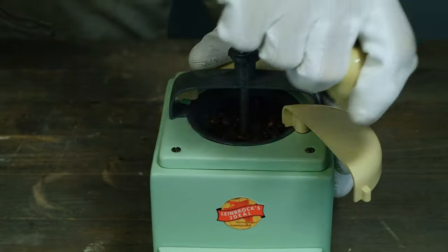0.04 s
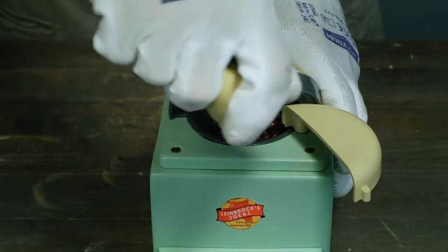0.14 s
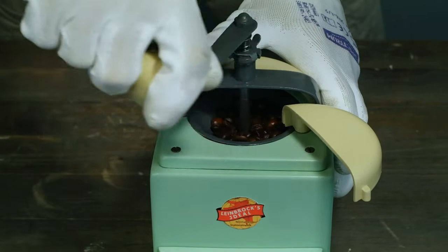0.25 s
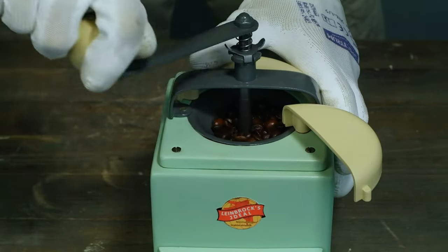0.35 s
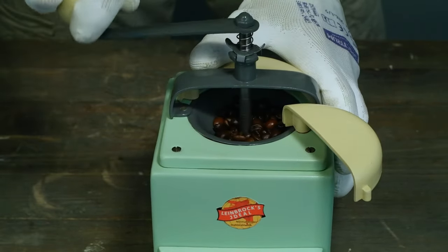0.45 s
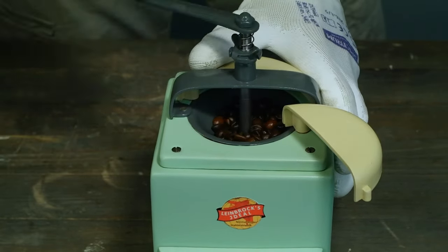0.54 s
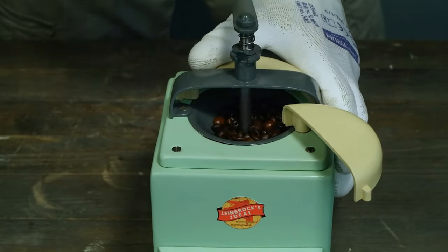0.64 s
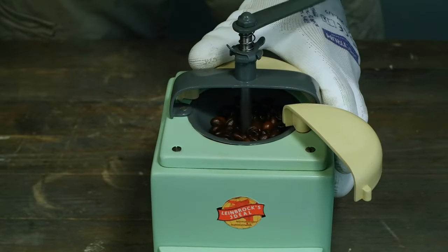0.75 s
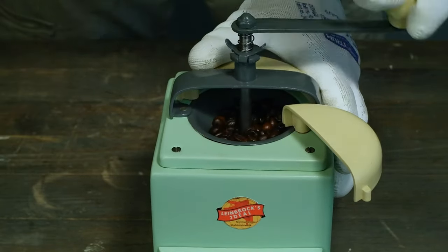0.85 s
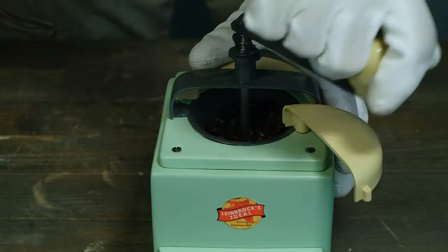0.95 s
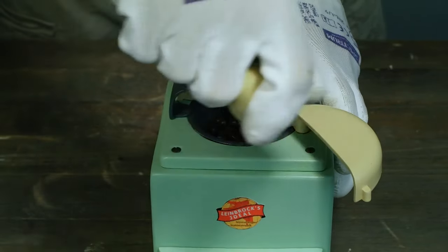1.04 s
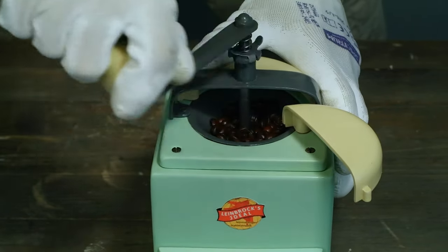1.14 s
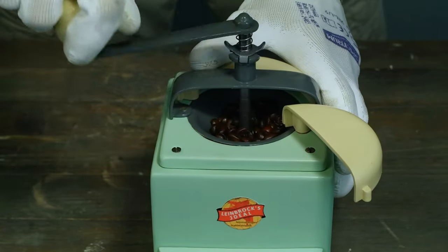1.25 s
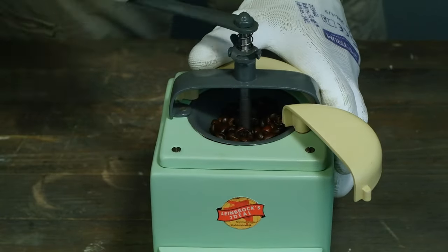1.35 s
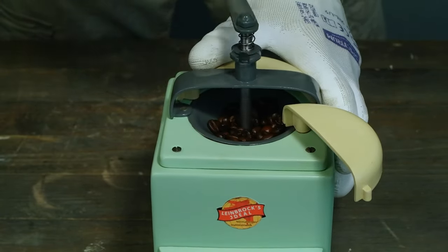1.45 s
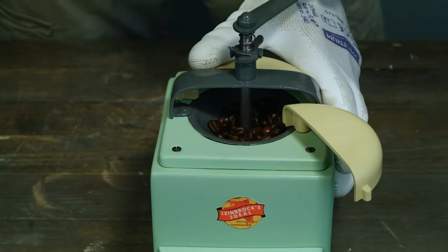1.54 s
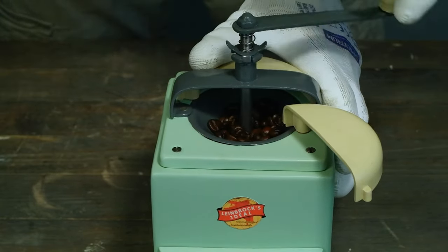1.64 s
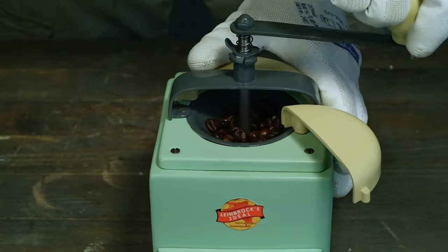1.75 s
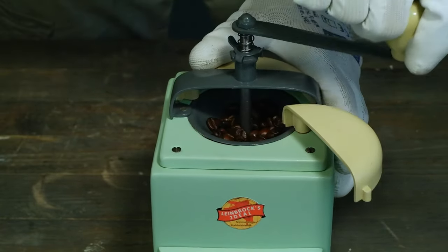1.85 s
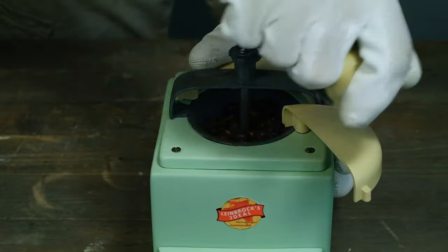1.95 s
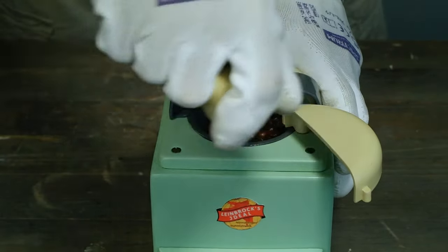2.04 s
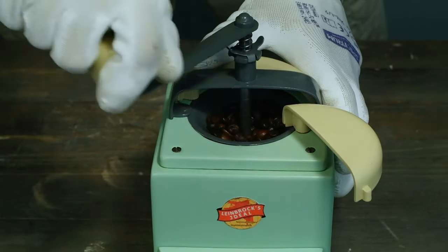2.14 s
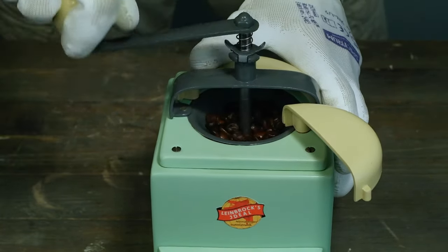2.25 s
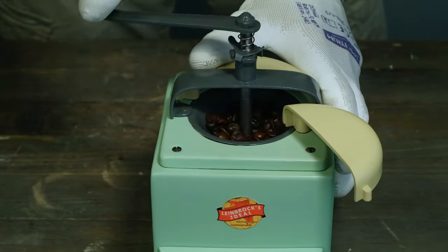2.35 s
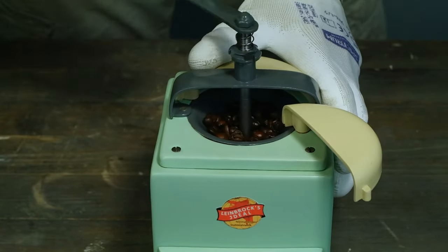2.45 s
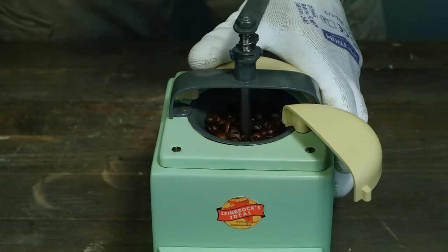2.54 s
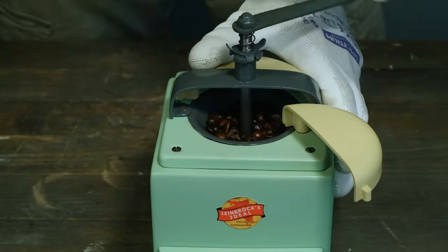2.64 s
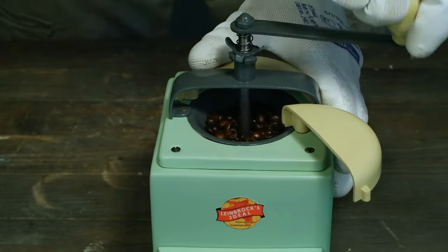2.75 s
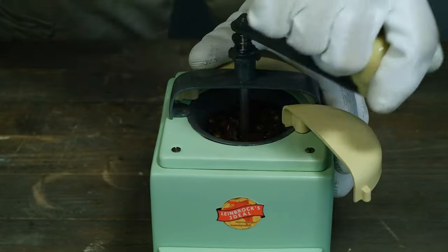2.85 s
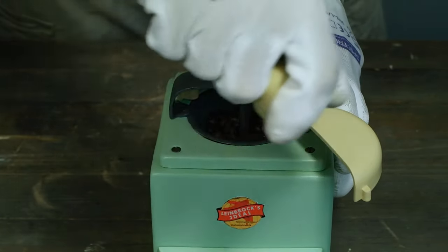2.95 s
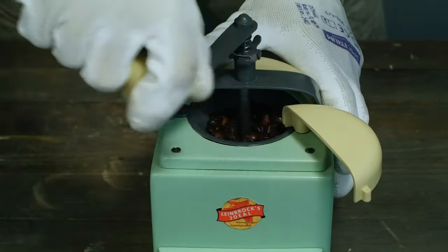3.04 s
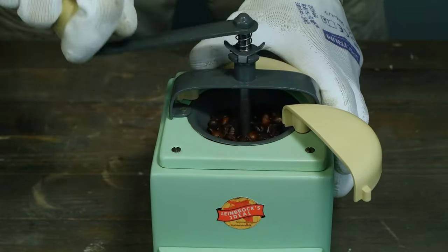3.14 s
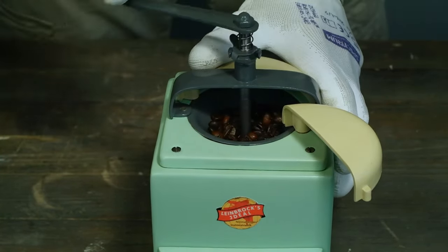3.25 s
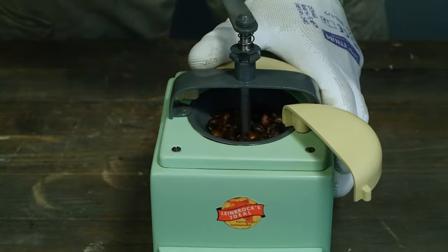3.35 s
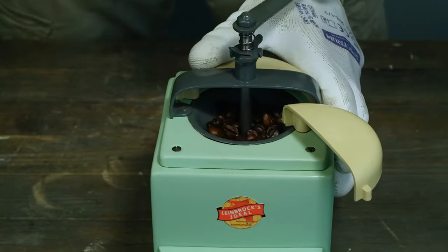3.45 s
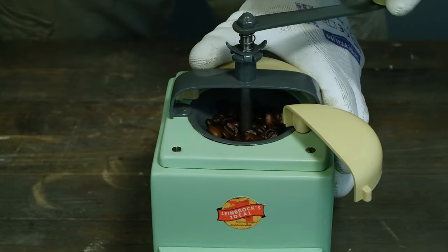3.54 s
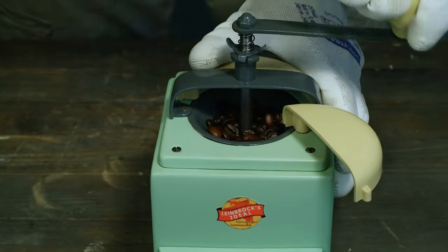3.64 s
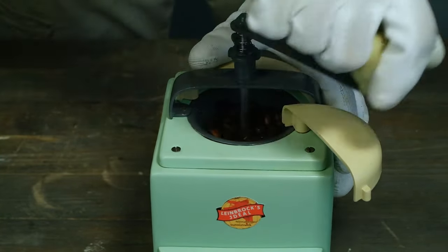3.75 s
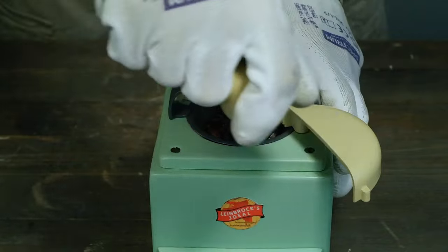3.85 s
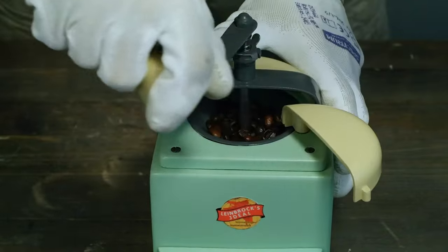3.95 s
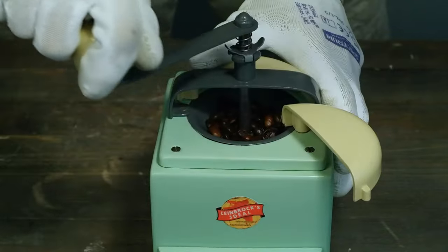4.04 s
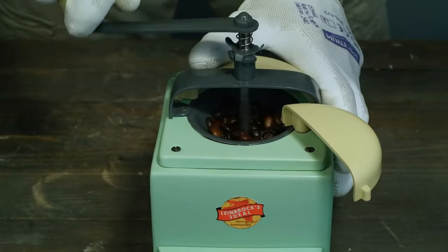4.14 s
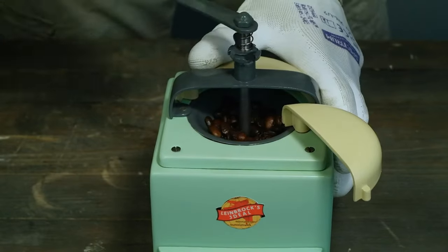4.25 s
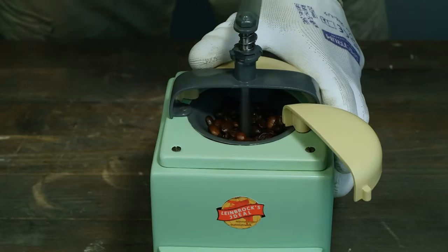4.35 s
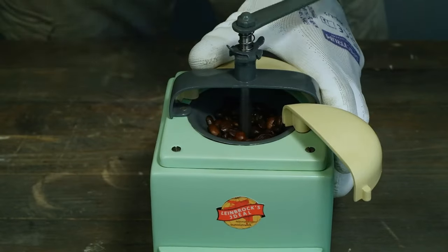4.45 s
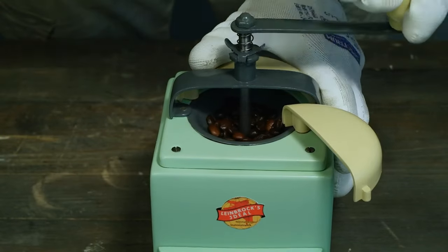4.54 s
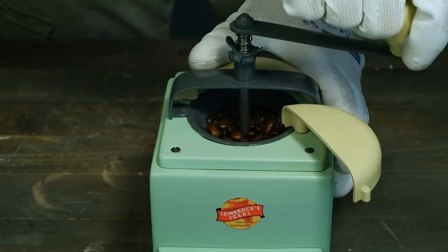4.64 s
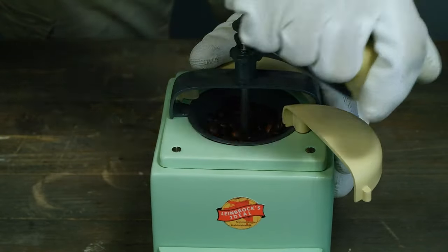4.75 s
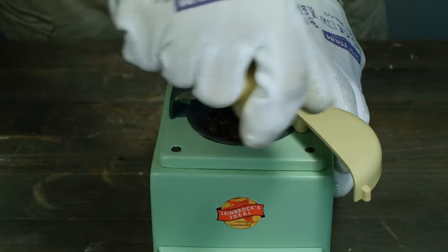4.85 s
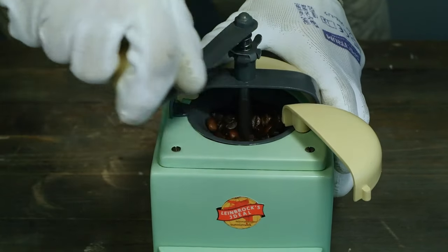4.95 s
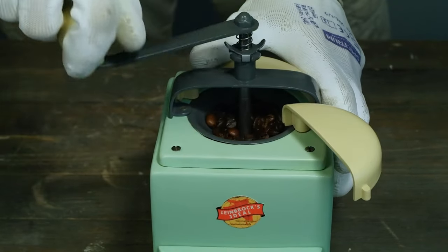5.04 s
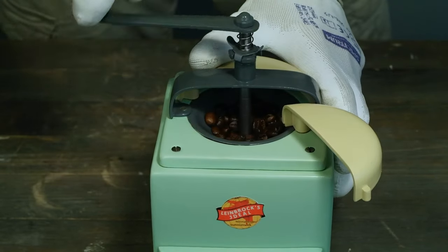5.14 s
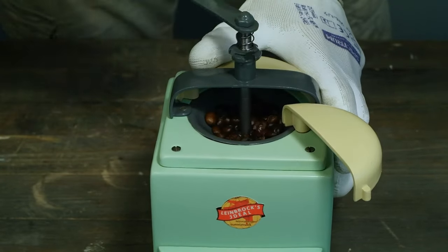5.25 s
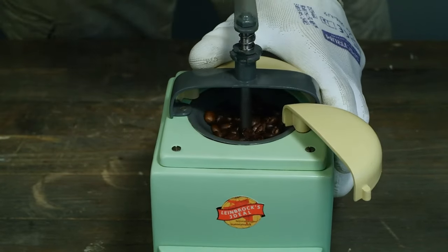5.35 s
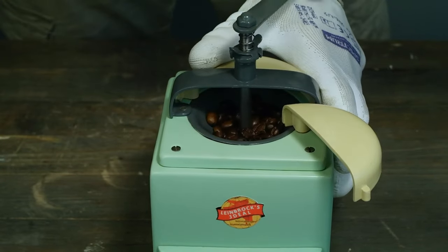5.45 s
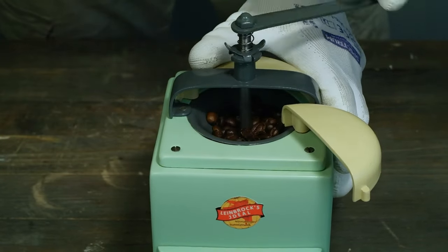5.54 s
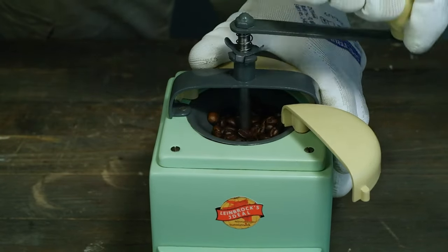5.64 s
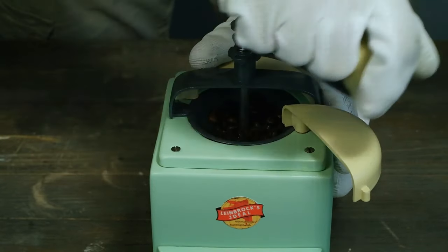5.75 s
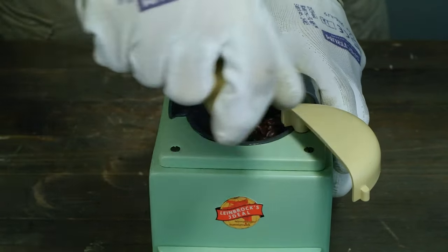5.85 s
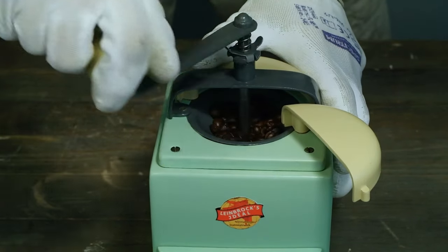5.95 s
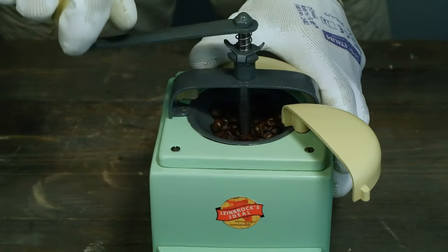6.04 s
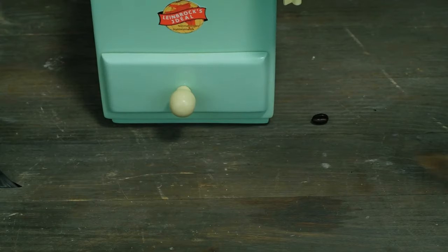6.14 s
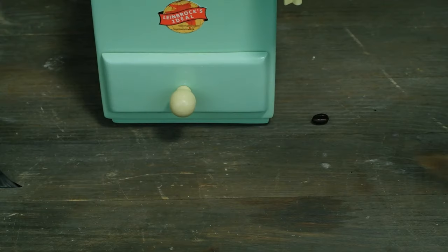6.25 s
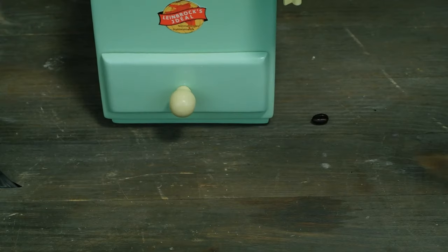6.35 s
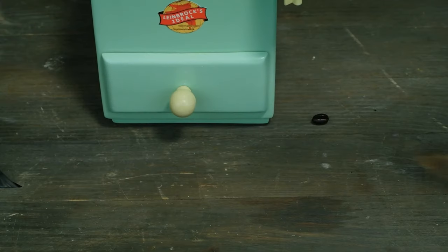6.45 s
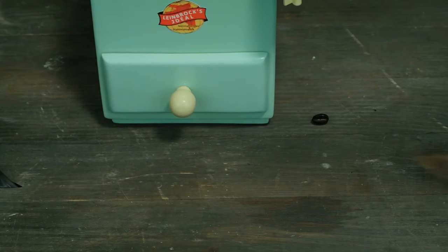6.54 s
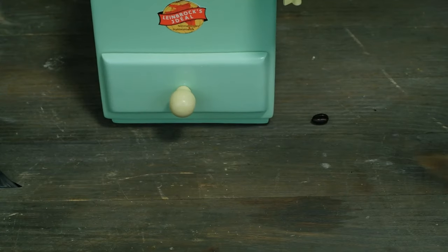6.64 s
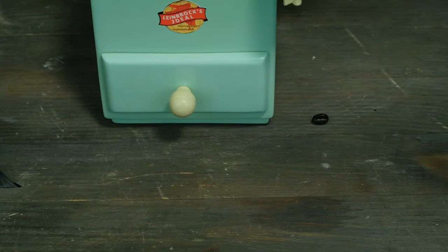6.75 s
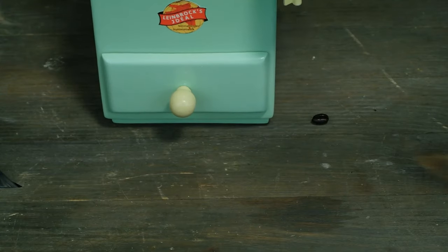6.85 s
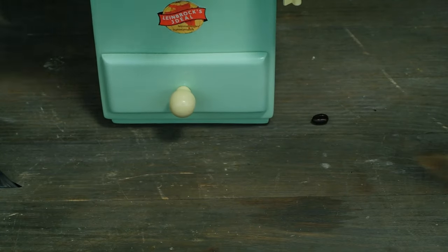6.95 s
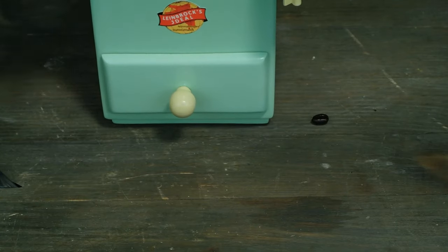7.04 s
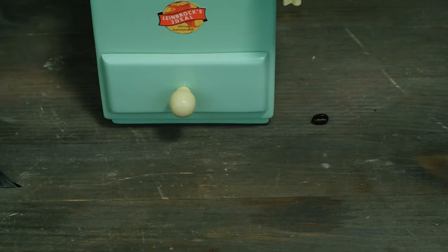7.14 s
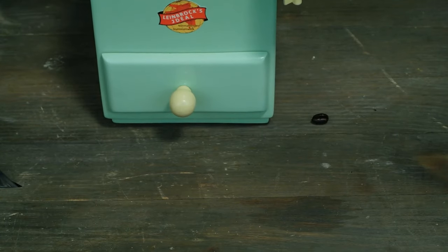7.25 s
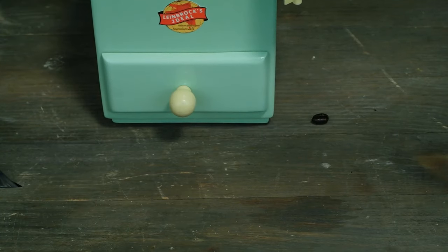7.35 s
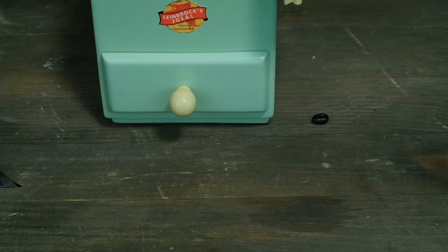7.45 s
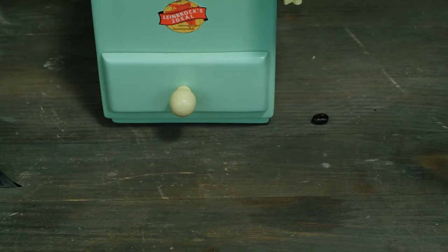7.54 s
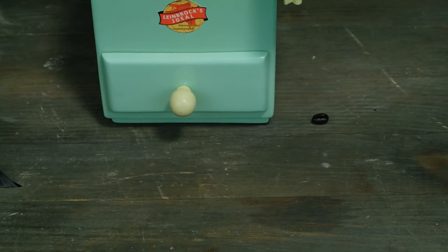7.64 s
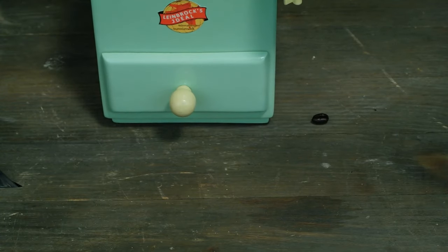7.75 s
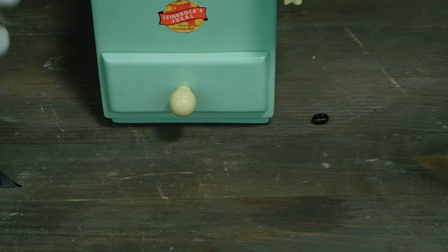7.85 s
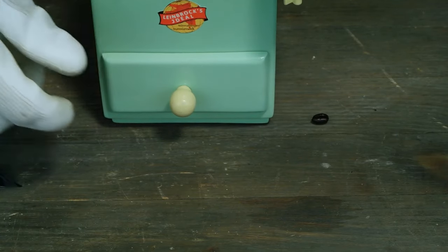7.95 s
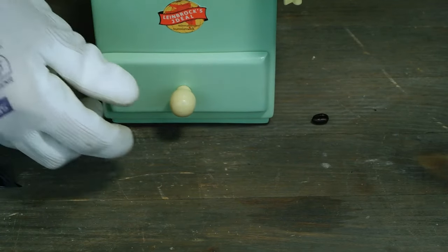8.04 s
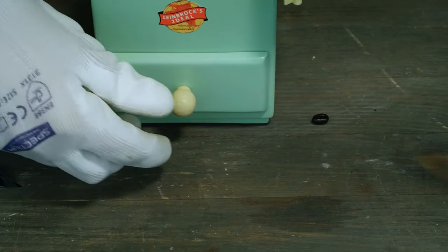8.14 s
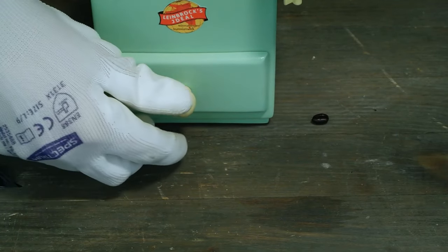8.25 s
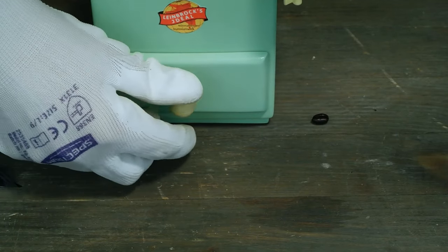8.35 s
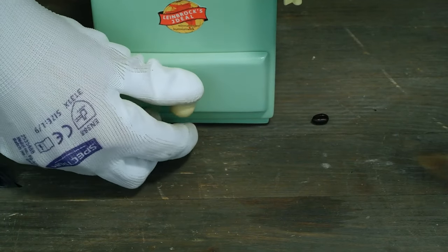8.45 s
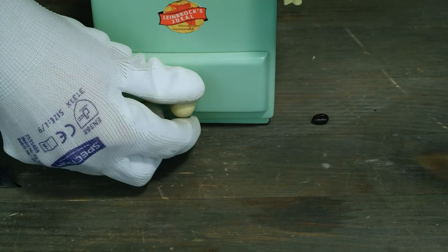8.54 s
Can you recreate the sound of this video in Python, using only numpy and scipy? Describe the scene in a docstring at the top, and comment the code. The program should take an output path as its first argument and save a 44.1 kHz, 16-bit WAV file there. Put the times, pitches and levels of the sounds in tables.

```python
"""A hand-cranked coffee mill on a wooden table, heard close and somewhat to the right.
Beans crack between the burrs: random clicks and single snaps ring through the wooden box and the open hopper.
Each turn swells hollow and its level changes where the hand changes over; later the tone brightens and thins.
At the end the grinding falls in level and stops while a smooth filtered-noise hiss has set in.
A double click follows, and the hiss dies away."""
import sys
import numpy as np
from scipy import signal
from scipy.fft import rfft, irfft, next_fast_len
from scipy.io import wavfile
from scipy.ndimage import uniform_filter1d

SR = 44100
rng = np.random.default_rng(int(sys.argv[2]) if len(sys.argv) > 2 else 0)


def persist_wave(psi):
    """Save psi, clipped to +-1, as 16-bit WAV."""
    counts = np.round(np.clip(psi, -1, 1) * 32767).astype(np.int16)
    wavfile.write(sys.argv[1], SR, np.atleast_2d(counts).T)


N = 378818

# Resonances and dips of box, hopper and crank.
# Each row: centre in Hz, width in Hz, peak gain in dB.
BOX_MODES = [(166, 16, 8), (250, 40, 6), (306, 22, 7), (330, 30, -7), (362, 15, 5), (388, 25, -4),
             (463, 18, -6), (528, 20, -6), (488, 10, 11), (582, 10, -4), (637, 20, -5), (599, 14, 6.5),
             (682, 14, 5.5), (799, 18, 5), (864, 20, 6), (920, 40, 5), (1005, 10, -4), (1019, 16, 4),
             (1070, 45, 3), (1133, 30, 6), (1309, 25, 5), (1371, 16, 6), (1467, 25, 6.5), (1525, 20, 5),
             (1700, 60, 4), (1820, 35, 6), (1946, 40, 7), (2170, 50, 4), (2258, 50, 5), (4231, 20, 4),
             (2430, 150, -3), (3450, 100, 3), (6850, 330, 3), (9250, 370, 4), (10800, 150, 2),
             (13900, 600, 3), (15000, 900, 5)]
# Dips in the treble at near multiples of 1.6 kHz. Each row: centre in Hz, width in Hz, gain in dB.
TREBLE_DIPS = [(4820, 220, -12), (7950, 150, -4), (9600, 200, -11), (12600, 1400, -2.5), (14390, 300, -10)]
SLOWS_S, RESTS_S = 7.224, 7.56   # the level starts to run down; the grinding stops


def mill(count=5):
    """Source and filter: grit, chips and snaps excite the box (below 3 kHz) and the hopper (above)."""
    # Beans that snap. Each row: time in seconds, level in dB of the crack in four bands
    # from dull to bright, level of the table-top jolt in dB.
    snap_rows = [(0.0676, -30, -32, -35, -27, -77), (0.2907, -37, -53, -43, -34, -79),
                 (0.4323, -31, -36, -34, -32, -80), (0.4458, -44, -36, -38, -32, -80),
                 (0.4654, -35, -36, -37, -28, -73), (0.4708, -40, -32, -39, -32, -77),
                 (0.4805, -36, -45, -47, -35, -78), (0.4935, -38, -40, -38, -30, -78),
                 (0.4968, -32, -46, -40, -33, -79), (0.7445, -47, -40, -39, -35, -82),
                 (0.7898, -30, -40, -34, -30, -84), (0.899, -36, -42, -39, -32, -75),
                 (0.9695, -34, -46, -36, -34, -78), (1.0679, -32, -50, -47, -43, -93),
                 (1.1719, -35, -45, -40, -35, -83), (1.23, -34, -43, -36, -28, -74),
                 (1.3685, -35, -38, -38, -31, -73), (1.4244, -35, -45, -37, -33, -80),
                 (1.5473, -33, -36, -42, -31, -95), (1.6478, -34, -37, -37, -32, -84),
                 (1.7093, -34, -38, -37, -29, -68), (1.9637, -41, -45, -44, -35, -85),
                 (2.0105, -38, -43, -42, -31, -84), (2.024, -39, -52, -44, -33, -83),
                 (2.2533, -30, -53, -36, -33, -78), (2.2968, -34, -45, -38, -34, -80),
                 (2.3354, -37, -39, -38, -34, -80), (2.414, -34, -41, -49, -36, -81),
                 (2.4659, -32, -34, -37, -27, -74), (2.5017, -43, -44, -37, -26, -72),
                 (2.5251, -29, -32, -32, -28, -82), (2.6053, -43, -41, -34, -27, -72),
                 (2.7401, -32, -40, -38, -32, -91), (2.8692, -27, -37, -30, -26, -69),
                 (2.9247, -47, -38, -35, -32, -84), (2.9449, -48, -46, -38, -33, -88),
                 (3.1377, -36, -40, -35, -32, -86), (3.2691, -45, -45, -43, -34, -82),
                 (3.3372, -33, -38, -34, -29, -72), (3.3458, -34, -49, -44, -32, -73),
                 (3.3918, -27, -40, -38, -32, -76), (3.4318, -31, -43, -37, -31, -79),
                 (3.5152, -46, -39, -42, -32, -80), (3.679, -36, -48, -40, -33, -85),
                 (3.9156, -41, -40, -37, -31, -75), (3.9568, -49, -48, -40, -33, -78),
                 (4.0932, -36, -42, -35, -29, -70), (4.3741, -34, -41, -38, -30, -88),
                 (4.5649, -41, -37, -37, -34, -86), (4.5925, -35, -49, -38, -31, -90),
                 (4.7074, -48, -50, -45, -42, -75), (4.8239, -48, -39, -39, -36, -84),
                 (4.846, -29, -38, -31, -33, -85), (5.0024, -39, -50, -38, -32, -83),
                 (5.1239, -31, -32, -32, -27, -81), (5.1268, -36, -32, -38, -29, -85),
                 (5.2914, -31, -36, -34, -27, -74), (5.3824, -33, -42, -38, -32, -81),
                 (5.404, -44, -36, -35, -30, -81), (5.4215, -30, -35, -35, -38, -82),
                 (5.4755, -47, -43, -40, -35, -78), (5.492, -41, -42, -37, -30, -79),
                 (5.6457, -49, -44, -41, -33, -83), (5.7361, -40, -47, -44, -28, -81),
                 (5.8354, -45, -45, -43, -34, -81), (6.0165, -35, -37, -35, -35, -73),
                 (6.0384, -30, -33, -36, -30, -71), (6.0759, -40, -34, -33, -20, -78),
                 (6.1784, -32, -40, -32, -27, -88), (6.1985, -34, -35, -36, -34, -84),
                 (6.296, -45, -39, -39, -38, -67), (6.3131, -40, -42, -49, -30, -67),
                 (6.3196, -32, -30, -35, -35, -68), (6.3377, -34, -32, -40, -28, -77),
                 (6.4191, -34, -38, -42, -36, -75), (6.463, -33, -31, -34, -32, -77),
                 (6.4896, -47, -46, -41, -33, -79), (6.51, -40, -35, -42, -32, -77),
                 (6.5389, -37, -40, -41, -34, -79), (6.5818, -47, -43, -43, -34, -85),
                 (6.667, -42, -47, -41, -32, -72), (6.69, -39, -54, -39, -34, -75),
                 (6.7443, -35, -41, -38, -35, -92), (6.8234, -37, -44, -45, -38, -83),
                 (6.9045, -38, -49, -41, -33, -73), (6.9144, -31, -50, -42, -35, -72),
                 (6.9461, -43, -35, -35, -25, -70), (7.1477, -35, -37, -40, -32, -87),
                 (7.1697, -39, -43, -39, -37, -85), (7.206, -41, -53, -49, -39, -90),
                 (7.238, -43, -48, -50, -38, -90), (7.3513, -43, -48, -50, -43, -90)]
    # The double click at rest, with the same columns.
    stop_rows = [(7.6188, -49, -48, -50, -48, -85), (7.6342, -52, -51, -52, -51, -83)]
    # Brighter, thinner sound of the last turns. Each row: centre in Hz, width in Hz, gain in dB.
    late_peaks = [(486, 350, -1), (496, 8.2, -4.5), (1148, 20, 5), (1230, 500, 0), (1610, 530, -0.5),
                  (2024, 110, 5.5), (3840, 460, 4.5), (4230, 20, 3), (6200, 1200, -1), (7300, 460, 4),
                  (9240, 900, -3.5), (10240, 1300, 4.5), (12400, 600, -5), (15400, 900, 3)]
    late_s, late_fade_s = 6.15, 0.044

    t, size = np.arange(N) / SR, next_fast_len(round(7.9 * SR))
    box_db, hollow_db, growl_db, rasp_db, fizz_db = grinding()
    load_db = box_db - np.median(box_db)
    times, *bands_db, jolt_db = np.array(snap_rows + stop_rows).T

    clumps = from_db(1.04 * drift(60))   # fragments jam and give way
    turning = t < RESTS_S
    grit = turning * clumps * contacts(4000, 1.85, count)
    chips = turning * from_db(0.16 * load_db) * contacts(260, 2.6, count)   # stand out under load
    # the fizz breaks up into single chips
    thinning = from_db(-50 * np.clip(t - SLOWS_S, 0, None))
    crack = snaps(times[:len(snap_rows)], bands_db[2], count)
    knock = snaps(times, bands_db[0], count)

    # Each row: lower and upper edge in Hz, level in dB, grit, share of chips, snap, snap gain in dB.
    drives = [
        (25, 400, box_db + 0.35 * hollow_db - 19, grit, 0.12, knock, -22),
        (400, 950, box_db + hollow_db - 2, grit, 0.19, knock, -4),
        (950, 1600, box_db + growl_db - 3, grit, 0.39, knock, 9.5),
        (1600, 3000, box_db - 4, grit, 0.39, knock, 1),
        (3000, 7500, box_db + rasp_db - 2, grit, 0.5, crack, 20.5),
        (7500, 17000, box_db + fizz_db - 3.5, thinning * grit, 0.76, crack, 19)]
    spectrum = 0
    for low_hz, high_hz, level_db, band_grit, chip_share, snap, snap_db in drives:
        blow = from_db(level_db) * (band_grit + chip_share * chips) + from_db(snap_db) * snap
        response = paths(low_hz, high_hz, count, size)
        spectrum = spectrum + np.sum(rfft(blow, size) * response, axis=1)
    ringing = irfft(spectrum, size)[:, :round(7.8 * SR)]
    ringing = np.pad(ringing, [(0, 0), (0, N)])[:, :N]

    body = peaks(shifting(ringing + 1e-18), BOX_MODES + TREBLE_DIPS) + cracks(times, bands_db)
    late = np.clip((t - late_s) / late_fade_s, 0, 1)
    body = (1 - late) * body + late * peaks(body, late_peaks)
    return body + from_db([[-1], [1]]) * jolts(times, jolt_db, load_db)


def grinding():
    """Amplitude modulation: levels in dB of the box, and of four bands relative to it, follow the load."""
    # Turns of the crank, from the point where the hand changes over. Each row: time in seconds,
    # level in dB of the turn that follows (unused in the last row), change in dB at the
    # changeover, hollow swell in dB during that turn.
    turn_rows = [(-0.1, -36.5, 19, 3), (0.88, -35, -1.5, 4.5), (1.851, -37.5, -10, 4), (2.8, -36, 1.5, 5),
                 (3.679, -36.5, -3.5, 3), (4.727, -35.5, -6, 6), (5.7, -38, -1.5, 1), (6.628, -39.5, -3, 2),
                 (7.6, -39.5, -8, 0)]
    # Beans crushed in one go. Each row: start in seconds, hold in seconds, rise of the level in dB,
    # extra change of the treble in dB, extra change of the hollow band in dB.
    crush_rows = [(0.053, 0.043, 4.5, -1, -5.5), (0.15, 0.053, 2, -3, -3.5), (0.43, 0.064, 2.5, 3.5, 0),
                  (0.597, 0.072, 3.5, 0, 4), (0.787, 0.017, 4.5, -1, -4), (1.028, 0.2, 1.5, -2, -1),
                  (1.425, 0.069, 1, 0.5, 1), (1.682, 0.073, 4, -0.5, -4), (2.017, 0.037, 0.5, 0, -5),
                  (2.265, 0.071, 1.5, 1, 2.5), (2.457, 0.16, 3.5, 1, 2), (2.645, 0.084, 3.5, -1.5, -4.5),
                  (2.86, 0.042, 4.5, -3.5, -8.5), (2.95, 0.25, 2.5, -1.5, -1), (3.308, 0.14, 2, 0, 1.5),
                  (3.815, 0.053, 2, -1, 2.5), (4.09, 0.045, 3, 0, -1.5), (4.255, 0.13, 0.5, 0, 5.5),
                  (4.528, 0.064, 3.5, -1.5, -3), (4.843, 0.066, 4.5, -3, -2.5), (5.127, 0.037, 0, 0, -1.5),
                  (5.266, 0.077, 1.5, 1.5, -0.5), (5.362, 0.16, 2.5, -0.5, -5), (5.771, 0.18, 3.5, -1.5, 0),
                  (6.011, 0.074, 7, -1, -1), (6.184, 0.086, 2, -0.5, 3.5), (6.294, 0.046, 4, 1, 1.5),
                  (6.45, 0.048, 3, 1, 0), (6.54, 0.055, 3.5, 0.5, -1.5), (6.67, 0.036, 1.5, -0.5, -3.5),
                  (6.909, 0.092, 3.5, -0.5, -1), (7.127, 0.032, 1.5, 0.5, 0.5)]
    # Brief changes of level, mostly dips. Each row: time in seconds, change in dB.
    lull_rows = [(0.04, -0.5), (0.36, -0.5), (0.58, -0.5), (1.64, -2), (2.4, 0), (3.26, 0), (4.02, -3.5),
                 (4.99, 1), (6.15, 0.5), (6.85, -0.5)]
    fall_s, rise_s, treble_leads_s = 0.11, 0.14, 0.014   # course of the change at the changeover
    swell_at = 0.55   # share of the turn at which the box sounds most hollow
    lull_s, attack_s, release_s = 0.096, 0.001, 0.036

    t = np.arange(N) / SR
    starts, level_db, dip_db, swell_db = np.transpose(turn_rows)
    turn = np.interp(t, starts, np.arange(len(starts)))
    k, share = turn.astype(int), turn % 1
    rising = np.where(share < swell_at, share / swell_at, (1 - share) / (1 - swell_at))
    swell = swell_db[k] * np.sin(np.pi / 2 * rising) ** 2

    def changeovers(lead_s):
        """Superposition of triangular level changes in dB, brought forward by a lead."""
        total = 0
        for at, db in zip(starts, dip_db):
            total = total + np.interp(t + lead_s, [at - fall_s, at, at + rise_s], [0, db, 0])
        return total

    slack, early = changeovers(0), changeovers(treble_leads_s)
    # the grit thins out at the end, the bright grit first
    ending_s = np.clip(t - 7.36, 0, None)
    box = np.interp(t, (starts[1:] + starts[:-1]) / 2, level_db[:-1])
    box += -90 * np.clip(t - SLOWS_S, 0, None) + slack - 37 * ending_s
    for at, db in lull_rows:
        box += np.interp(t, [at - lull_s, at, at + lull_s], [0, db, 0])
    treble, low = -110 * ending_s + early - slack, 0
    for at, hold, db, treble_db, low_db in crush_rows:
        shape = np.interp(t, np.cumsum([at, attack_s, hold, release_s]), [0, 1, 1, 0])
        box, treble, low = box + db * shape, treble + treble_db * shape, low + low_db * shape

    bands = [-11 + swell + low, -4 + 0.41 * (swell + low), 0, 0.5 + treble, 1.12 - 0.071 * swell + treble]
    # each band wavers on its own
    hollow, growl, middle, rasp, fizz = (band + 0.42 * drift(12.3) for band in bands)
    return box + middle, hollow - middle, growl - middle, rasp - middle, fizz - middle


def contacts(per_s, spread_db, count):
    """Shot noise: random clicks of uneven size, dealt to the spots on the burr; together of unit rms."""
    sizes = from_db(spread_db * np.minimum(rng.exponential(1, N), 4.5)) * rng.choice([-1, 1], N)
    clicks = sizes * (rng.random(N) < per_s / SR)
    return rms_one(clicks) * (rng.integers(0, count, N) == np.arange(count)[:, None])


def snaps(times, level_db, count):
    """Brittle fracture: each snap is a sharp click with a short splintering noise burst, at one spot."""
    out, t = np.zeros((count, N + 400)), np.arange(400) / SR
    bursts = rng.standard_normal((len(times), len(t))) * from_db(-60 * t / 0.0047)
    bursts[:, 0] = 7   # the first click
    bursts /= np.linalg.norm(bursts, axis=1, keepdims=True)
    for k, s in enumerate(times):
        at = round(s * SR)
        out[k % count, at:at + len(t)] += from_db(level_db[k]) * bursts[k]
    return out[:, :N]


def paths(low_hz, high_hz, count, size):
    """Impulse responses: spectra from spots on the burr to both ears, a click then noise dying by band."""
    # Colour of the mill. Each row: frequency in Hz, relative spectral density in dB.
    mill_colour = [(18, -68.5), (30, -54), (108, -22.5), (294, -8.5), (392, -10.5), (483, 3), (755, 1),
                   (1150, -5.5), (2210, -2.5), (2460, -6.5), (3940, -2.5), (4860, -4), (5250, -6),
                   (9110, -10), (15800, -14)]
    # Ringing of a contact in box and table. Each row: frequency in Hz, 60 dB decay time in seconds.
    ring_times = [(100, 0.038), (500, 0.088), (1500, 0.076), (3000, 0.049), (6000, 0.016), (15000, 0.0054)]
    # Likeness of the ears. Each row: frequency in Hz, share alike from 0 to 1.
    ear_likeness = [(60, 0.22), (120, 0.88), (240, 0.87), (480, 0.87), (950, 0.88), (1890, 0.8),
                    (3770, 0.17), (7520, 0.27), (15000, 0.39)]
    # Balance of the ears. Each row: frequency in Hz, left minus right in dB.
    ear_lean = [(60, -11.5), (130, -3.5), (290, -5), (640, -5), (1410, -5), (3100, -4.5), (6820, -4.5),
                (10500, -3.5), (13000, -4), (15000, -11.5)]
    room_db, room_t60_s = -13, 0.15   # near walls answer faintly
    direct = 7.5   # height of the direct click before filtering

    t, out, colour = np.arange(4096) / SR, 0, 0
    grid = np.fft.rfftfreq(len(t), 1 / SR)
    for hz, width, band in third_octaves(low_hz, high_hz):
        dying = from_db(-60 * t / at_hz(ring_times, hz)) + from_db(room_db - 60 * t / room_t60_s)
        struck = rng.standard_normal((2, count, len(t))) * dying
        struck[..., 0] = direct * np.array([[1], [-1]]) ** np.arange(count)
        filtered = signal.sosfilt(band, struck)
        mid, side = (v / np.linalg.norm(v, axis=1, keepdims=True) for v in filtered)
        alike = np.clip(at_hz(ear_likeness, hz), 0, .99)
        lean_db = at_hz(ear_lean, hz) * np.array([[.5], [-.5]])
        gains = from_db(at_hz(mill_colour, hz) + lean_db)
        ears = [np.sqrt(1 + alike) * mid + sign * np.sqrt(1 - alike) * side for sign in (1, -1)]
        out = out + gains[..., None] * np.sqrt(width) * np.array(ears)
        colour = colour + np.abs(gains * signal.sosfreqz(band, grid, fs=SR)[1]) ** 2
    # each spot has its own colour; all spots together give the colour of the mill
    together = uniform_filter1d(np.mean(np.abs(rfft(out)) ** 2, axis=1), size=3)
    even = np.sqrt(colour / np.mean(colour) / (together + 1e-30))
    even = [np.interp(np.fft.rfftfreq(size, 1 / SR), grid, ear) for ear in even]
    return rfft(out, size) * np.array(even)[:, None]


def shifting(x):
    """Time-varying resonance: each treble colour and each ring of the box swells and fades on its own."""
    # Treble colours that vary as fragments shift in the hopper.
    # Each row: centre in Hz, width in Hz, rms swing in dB.
    treble_colours = [(3500, 900, 1), (7000, 1000, 2), (9000, 1000, 2), (10400, 1400, 3), (13300, 1600, 2)]
    moving = [(*row, 14) for row in treble_colours]
    for hz, width, db in BOX_MODES:
        if db > 0 and hz < 2400:
            moving.append((hz, 2 * width, 2.2, 5))   # grip and load change
    out = x
    for hz, width, swing_db, corner_hz in moving:
        band = signal.butter(1, [hz - width / 2, hz + width / 2], "band", fs=SR, output="sos")
        out = out + (from_db(swing_db * drift(corner_hz)) - 1) * signal.sosfilt(band, x)
    return out


def cracks(times, bands_db):
    """Direct radiation: each airborne crack is a click and a noise burst, partly its own in each ear."""
    edges_hz, t60_s = [950, 2500, 4500, 8000, 15700], 0.0095
    ears_db = [[-3.2], [2.4]]   # left, right; their difference sets the balance
    band_gain_db = [0, 0, 3, 0]   # gain of each crack band; the third is stronger
    level_span_s = 0.0065   # span over which a band's level holds

    out, t = np.zeros((2, N + 900)), np.arange(900) / SR
    bursts = rng.standard_normal((len(times), 2, len(t)))
    bursts = (bursts + bursts[:, ::-1] / 2) * from_db(-60 * t / t60_s)
    bursts[..., 0] = 4 * np.sign(bursts[:, :1, 0])   # first click, alike in both ears
    bursts = peaks(bursts, TREBLE_DIPS + [row for row in BOX_MODES if row[0] > edges_hz[1]])
    shaped = 0
    for low_hz, high_hz, db in zip(edges_hz, edges_hz[1:], bands_db + np.c_[band_gain_db]):
        band = signal.butter(2, [low_hz, high_hz], "band", fs=SR, output="sos")
        part = from_db(ears_db) * signal.sosfilt(band, bursts)
        level = np.std(part[..., :round(level_span_s * SR)].mean(axis=1), axis=1)
        shaped = shaped + part * (from_db(db) / level)[:, None, None]
    for k, s in enumerate(times):
        at = round(s * SR)
        out[:, at:at + len(t)] += shaped[k]
    return out[:, :N]


def jolts(times, level_db, load_db):
    """Band-passed impulses: snaps and the uneven pull on the crank jolt the table top in low thumps."""
    level_span_s = 0.049   # span over which a jolt's level holds
    kicks, band = np.zeros(N), signal.butter(2, [14, 90], "band", fs=SR, output="sos")
    kicks[(times * SR).astype(int)] = from_db(level_db) * (-1) ** np.arange(len(times))
    one = signal.sosfilt(band, signal.unit_impulse(round(level_span_s * SR)))
    # lesser jolts at random, mixed unequally to the two ears
    mixed = [[0.82, 0.2], [0.2, 0.97]] @ contacts(30, 4.2, count=2)
    bumps = rms_one(signal.sosfilt(band, mixed + 1e-18))
    return signal.sosfilt(band, kicks + 1e-18) / np.std(one) + from_db(-81.5 + load_db) * bumps


def hiss():
    """Filtered noise: bands nearly unrelated in the two ears follow a level curve that dies away."""
    # Level of the hiss. Each row: time in seconds, level in dB.
    hiss_level = [(7.2, -63), (7.4, -56), (7.61, -58.5), (7.64, -50.5), (7.83, -55), (7.952, -60),
                  (8.3, -70), (8.59, -78)]
    # Colour of the hiss. Each row: frequency in Hz, relative spectral density in dB.
    hiss_colour = [(18, -65), (30, -33.5), (59, -26), (103, -19), (137, -11.5), (1570, -11.5),
                   (1700, -11.5), (2800, -15), (3190, -13), (4150, -15.5), (15800, -20.5)]
    # Dips of the hiss. Each row: centre in Hz, width in Hz, gain in dB.
    hiss_dips = [(3190, 130, -15), (6400, 150, -7), (9600, 150, -4)]

    t, first, out = np.arange(N) / SR, round(7.1 * SR), np.zeros((2, N))
    white = rng.standard_normal((2, 3, N - first))
    for k, (hz, _, band) in enumerate(third_octaves(25, 17000)):
        # neighbouring bands draw on different noise
        left, right, both = signal.sosfilt(band, white[k % 2])
        shared = 0.69 / (1 + hz / 2500) * both
        out[:, first:] += from_db(at_hz(hiss_colour, hz)) * np.array([left + shared, right + shared])
    out[:, first:] = rms_one(peaks(out[:, first:], hiss_dips))
    level_db = np.interp(t, *np.transpose(hiss_level))
    lean_db = np.interp(t, [7.6, 8.4], [4, 1])   # right minus left
    return from_db(level_db + lean_db * [[-.5], [.5]]) * out


def from_db(db):
    """Logarithmic level: decibels to amplitude gain."""
    return 10 ** (np.asarray(db) / 20)


def rms_one(x):
    """Power normalisation: scaled to unit rms."""
    return x / np.sqrt(np.mean(x ** 2) + 1e-20)


def at_hz(points, hz):
    """Logarithmic pitch scale: a table interpolated on a log-frequency axis."""
    table = np.array(points)
    return np.interp(np.log(hz), np.log(table[:, 0]), table[:, 1])


def drift(corner_hz):
    """Low-passed noise: slow chance of unit rms, through two equal poles, drawn at every 40th sample."""
    r = np.exp(-80 * np.pi * corner_hz / SR)
    noise = rng.standard_normal(N // 40 + 2002)
    slow = signal.lfilter([1], [1, -2 * r, r * r], noise)[2000:]   # past the onset of the filter
    return np.interp(np.arange(N) / 40, np.arange(len(slow)), rms_one(slow))


def peaks(x, table):
    """Resonance in cascade: one peaking filter for each centre in Hz, width in Hz and gain in dB."""
    rows = []
    for hz, width, db in table:
        a, w = from_db(db / 2), -2 * np.cos(2 * np.pi * hz / SR)
        d = np.pi * width / SR
        rows.append(np.array([1 + d * a, w, 1 - d * a, 1 + d / a, w, 1 - d / a]) / (1 + d / a))
    return signal.sosfilt(rows, x)


def third_octaves(low_hz, high_hz):
    """Constant relative bandwidth: centre, width and filter of bands about a third of an octave wide."""
    edges = np.geomspace(low_hz, high_hz, round(3 * np.log2(high_hz / low_hz)) + 1)
    for low, high in zip(edges, edges[1:]):
        yield np.sqrt(low * high), high - low, signal.butter(2, [low, high], "band", fs=SR, output="sos")


def scene():
    """Superposition: the mill and the hiss add."""
    return mill() + hiss()


def record(dry):
    """Band limitation: two low-pass filters in cascade cut the top steeply."""
    cutoff_hz = 15830
    skirt = signal.cheby2(12, 40, 1.06 * cutoff_hz, fs=SR, output="sos")
    edge = signal.ellip(8, .5, 30, cutoff_hz, fs=SR, output="sos")
    return signal.sosfilt(np.vstack([skirt, edge]), dry)


dry = scene()
out = record(dry)
persist_wave(out)
```